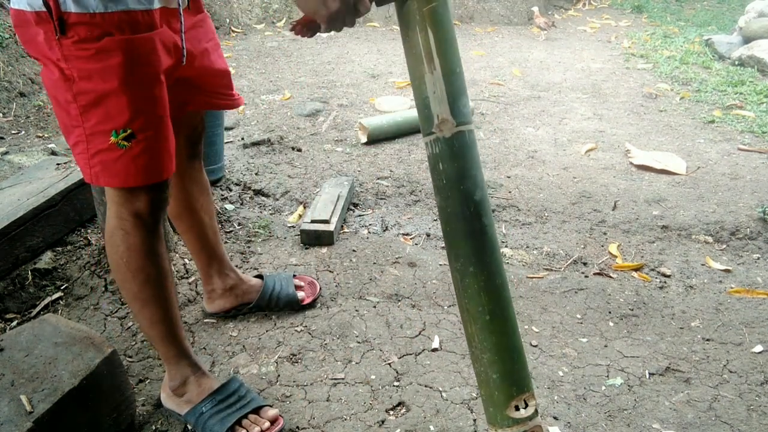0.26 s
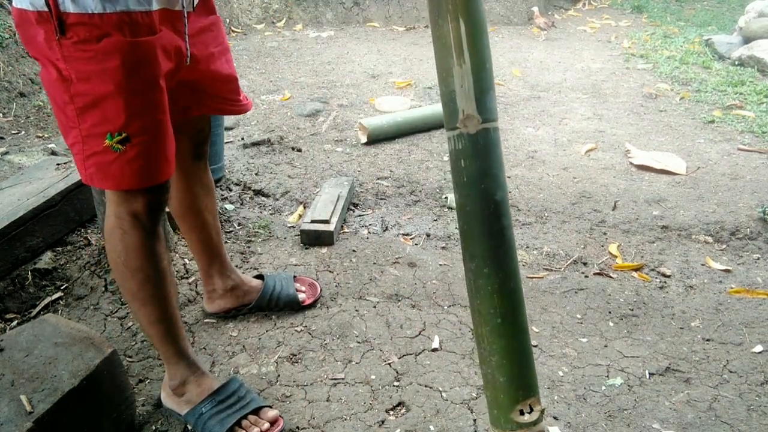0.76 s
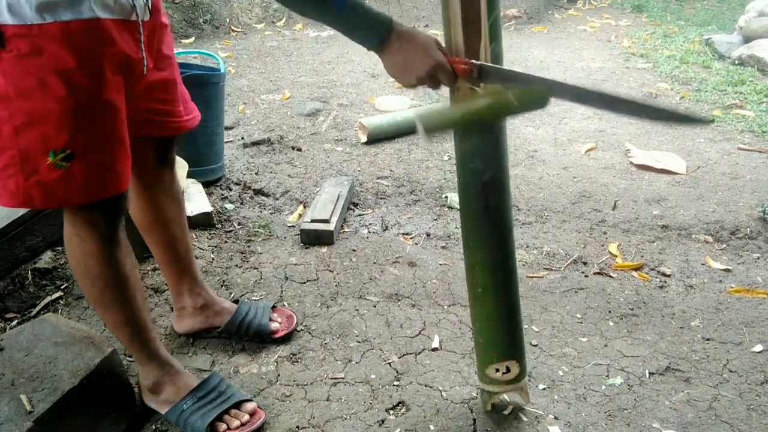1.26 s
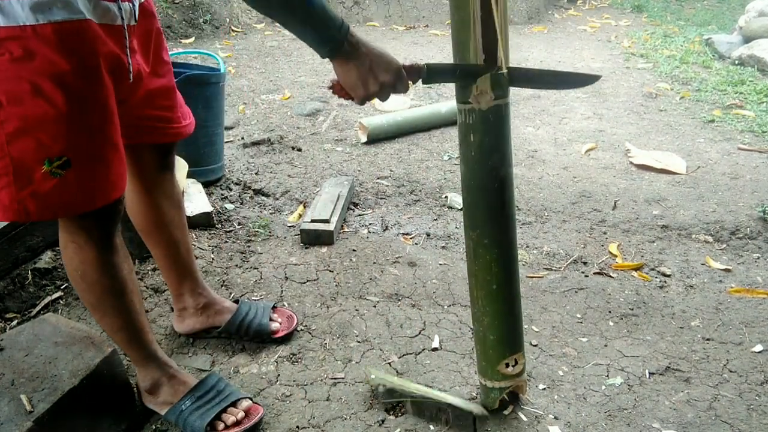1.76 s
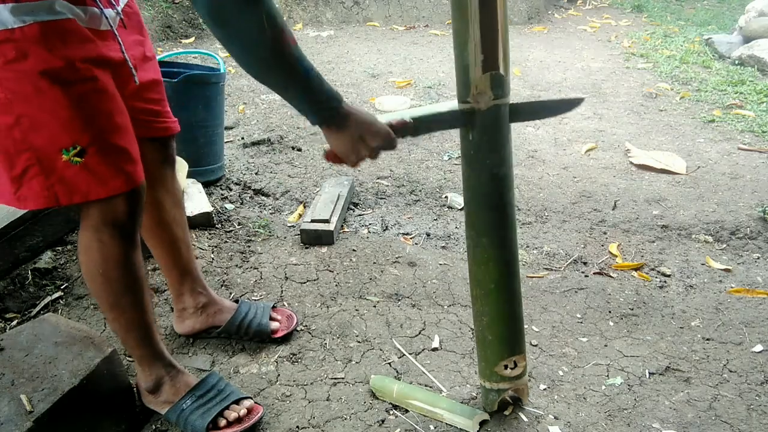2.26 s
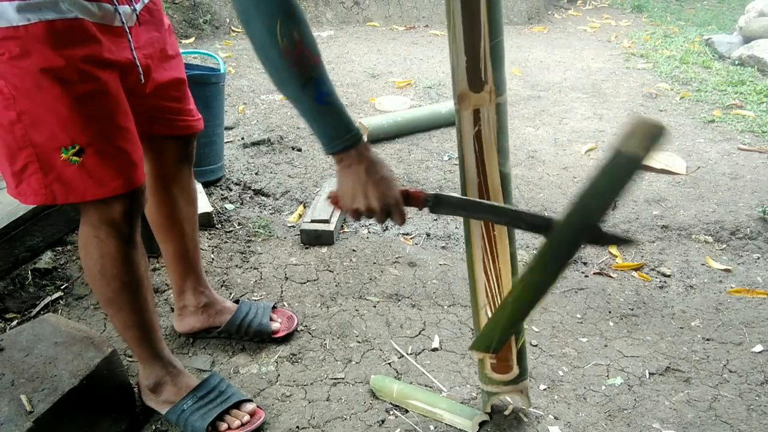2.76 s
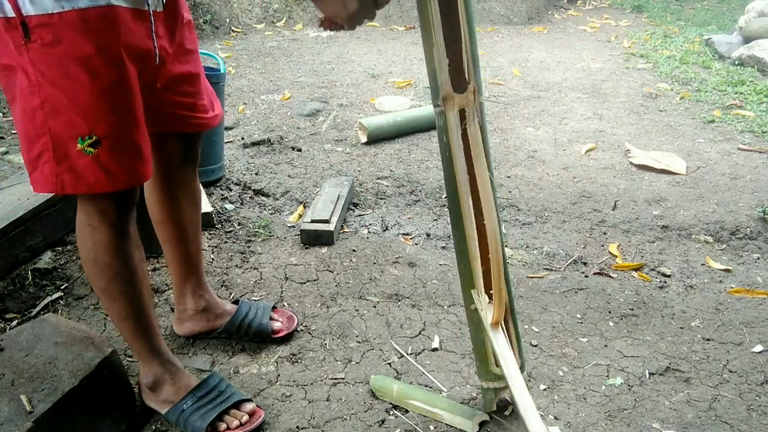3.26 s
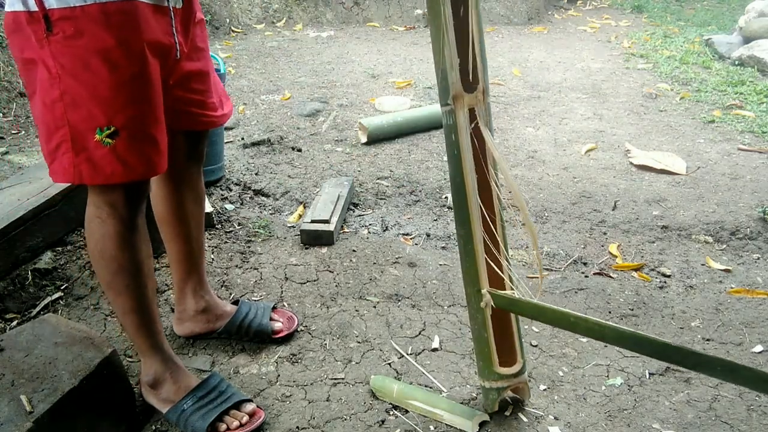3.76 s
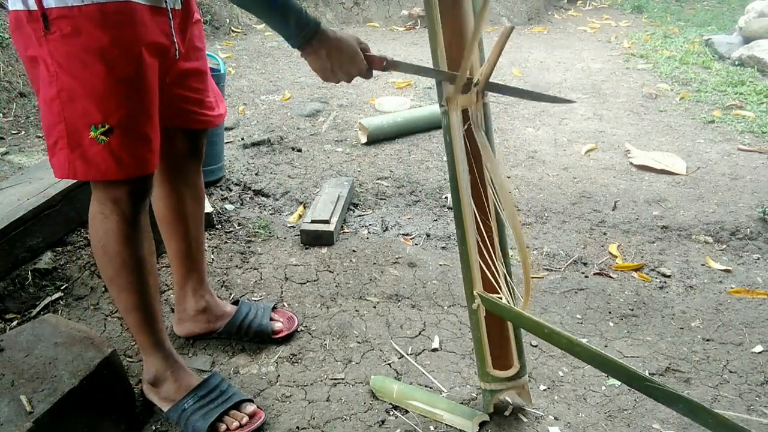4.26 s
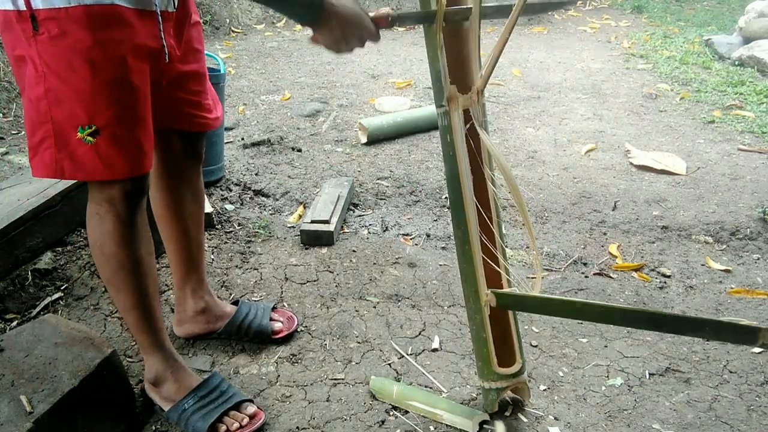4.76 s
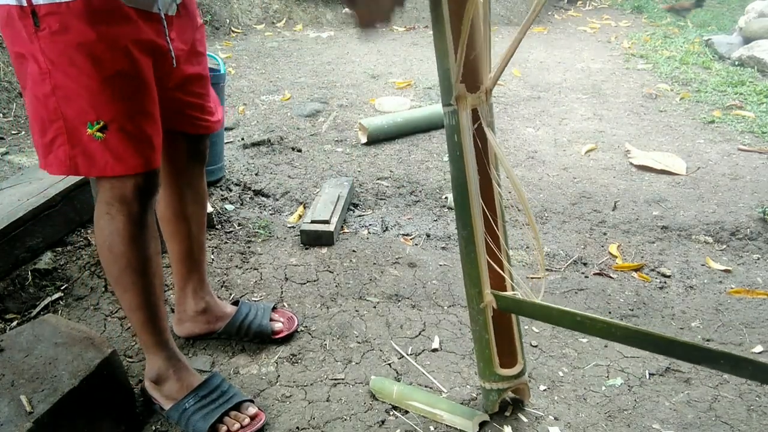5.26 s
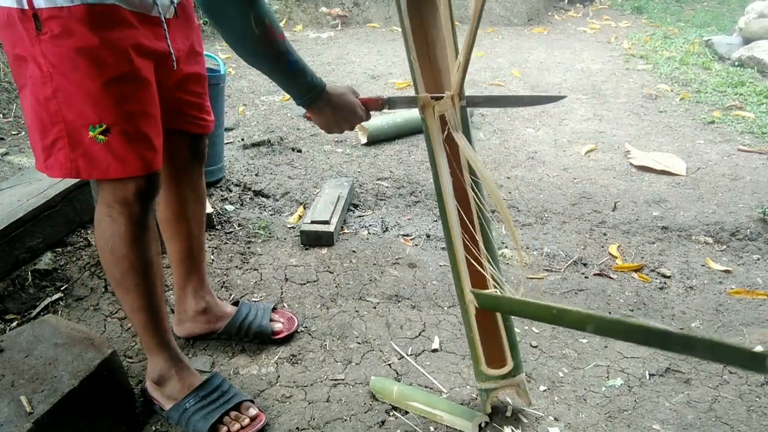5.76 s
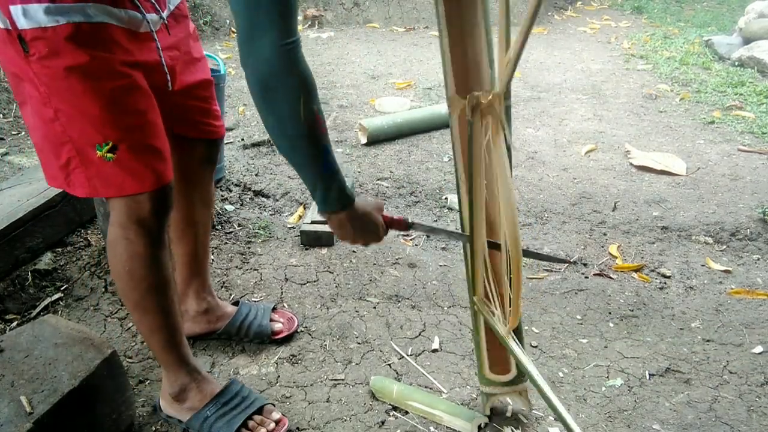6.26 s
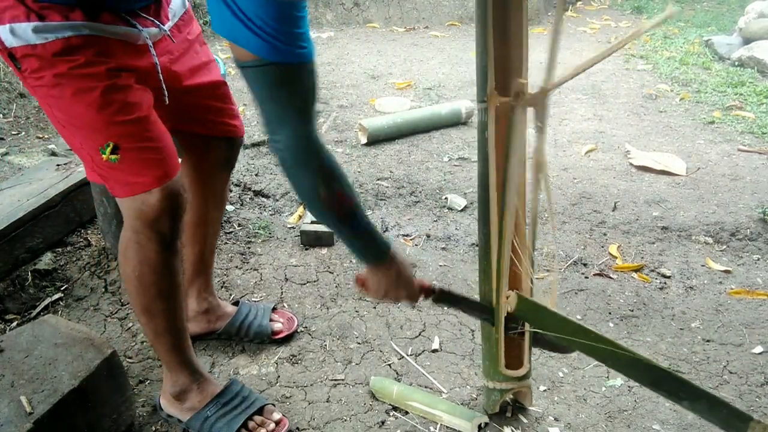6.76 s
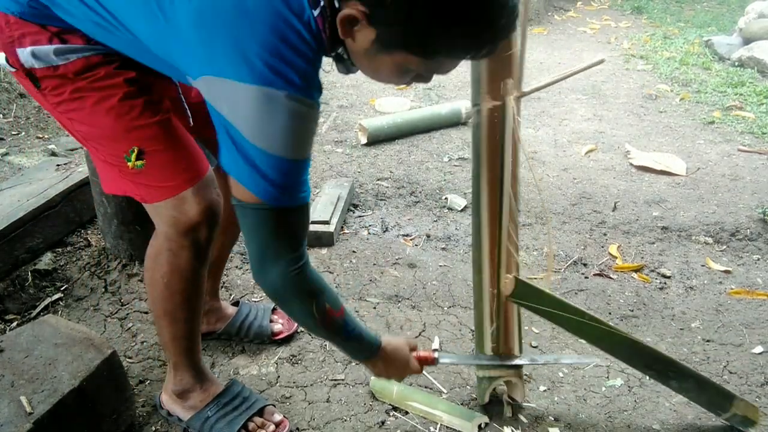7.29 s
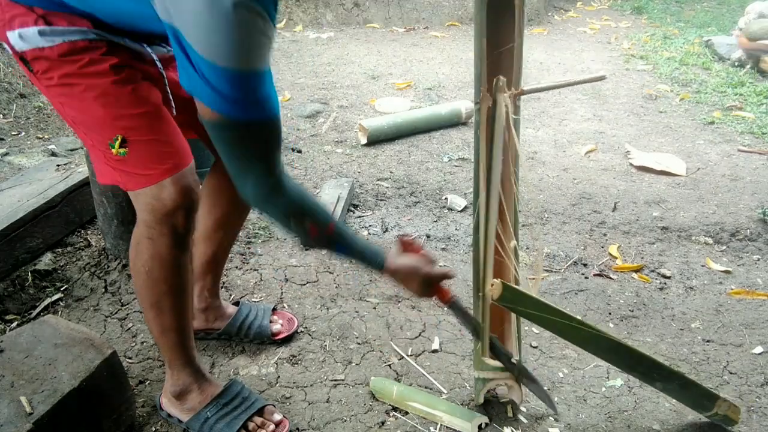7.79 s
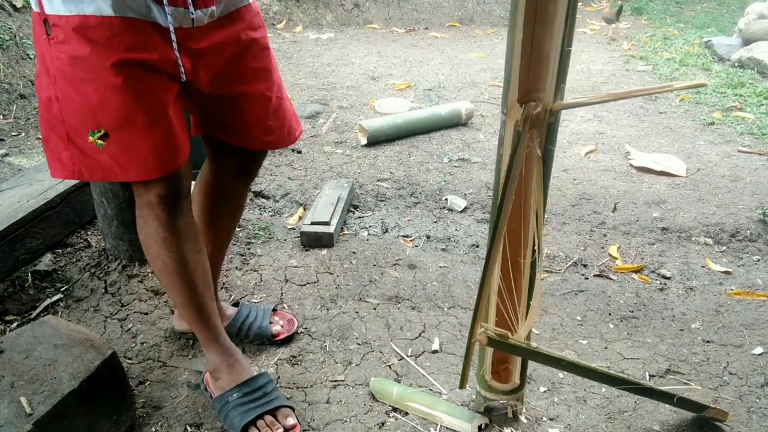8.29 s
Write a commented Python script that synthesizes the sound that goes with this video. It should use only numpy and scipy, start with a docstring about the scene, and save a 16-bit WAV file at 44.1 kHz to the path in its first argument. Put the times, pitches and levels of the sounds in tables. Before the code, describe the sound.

Outdoors in a backyard workshop, close up, a blade nicks a bamboo pole at once and bites crisply at 0.3 s, over a low distant rumble; a chick peeps thinly at 0.2 s. A hollow chop lands at 1.0 s, with cracking and dull bumps of a loose piece until 1.9 s. Strong blows at 2.3 and 2.5 s tear the stem with a loud swelling crackle and sharp snaps. Woody chops follow about every third of a second from 3.3 to 4.6 s, chicks peeping at 3.5 and 3.8 s. Strips rustle around 5 s; chops, snaps and knocks crowd 5.1-5.9 s as the rumble briefly swells, then dies away. Splitting and rustling continue at 6.2-6.9 s. Hens cluck at 5.4, 6.5, 7.5 and 8.4 s. Hard chops at 7.4 and 7.8 s mingle with peeps, and a dull final chop comes at 8.4 s.

```python
"""A long blade chops and splits a standing green bamboo pole in a backyard workshop, close to the microphone.
From the start a low distant rumble lies under it; each blow snaps fibres and knocks the hollow stem.
Chicks soon peep further off; strips tear with a swelling crackle, thick fibres crack, loose strips rustle.
Dull knocks follow as the pole is levered; later grown chickens call, and the rumble dies away.
Stem and steel are damped modes, fibres random clicks, birds gliding tones, the rumble shaped noise."""
import sys
import numpy as np
from scipy import signal
from scipy.fft import rfft, irfft
from scipy.io import wavfile
from scipy.ndimage import uniform_filter1d

SR = 44100
rng = np.random.default_rng(int(sys.argv[2]) if len(sys.argv) > 2 else 0)


def pcm_store(signal):
    """Save signal as 16-bit PCM."""
    levels = np.round(np.clip(np.atleast_2d(signal), -1, 1) * 32767)
    wavfile.write(sys.argv[1], SR, levels.astype(np.int16).T)


N = 376173  # length in samples


def gain_of(db):
    """Decibels to amplitude."""
    return 10 ** (np.asarray(db) / 20)


def evened(x):
    """Scales to rms 1."""
    return x / np.sqrt(np.mean(x ** 2) + 1e-20)


def burst(x, db):
    """Gives a short sound the energy of 30 ms at this rms level."""
    return gain_of(db) * x * np.sqrt(.03 * SR / (np.sum(x ** 2) + 1e-20))


def read(points, hz):
    """Reads a table of (Hz, value) along a log-frequency axis."""
    f, value = np.transpose(points)
    return np.interp(np.log(hz + 1), np.log(f + 1), value)


def add(mix, s, sound):
    """Mixes a sound in at a time in seconds, cutting what runs past the end."""
    part = mix[max(round(s * SR), 0):][:len(sound)]
    part += sound[:len(part)]


def wavering(count, size):
    """Smooth random curve, rms 1 over the whole scene, changing about every size samples."""
    smooth = uniform_filter1d(rng.standard_normal(N), size)
    return evened(uniform_filter1d(smooth, size // 2))[:count]


def noise(colour):
    """Steady noise of a given spectrum, rms 1."""
    spectrum = rfft(rng.standard_normal(N))
    gain = gain_of(read(colour, np.fft.rfftfreq(N, 1 / SR)))
    return evened(irfft(spectrum * gain, N))


# Far-off rumble before its pitch shifts. Each row: frequency in Hz, relative level in dB.
RUMBLE_COLOUR = [(20, -28), (45, -2), (70, -1), (125, 6.5), (170, 0.5), (230, -14.5), (400, -29.5),
                 (900, -46.5), (3000, -65)]
# Faint hiss. Each row: frequency in Hz, relative level in dB.
HISS_COLOUR = [(100, -3.5), (1000, -4), (6000, -5), (8300, -2.5), (11000, -11), (16000, -25.5)]
RUMBLE_START_DB, RUMBLE_FALL_DB_PER_S = -58.5, 2.5  # the distant rumble recedes slowly
RUMBLE_DIES_S, RUMBLE_DIES_DB_PER_S = 6.13, 10  # from here on this much is added to the fall
SWELL_S, SWELL_WIDTH_S, SWELL_DB = 5.5, .17, 13  # it swells once, briefly
RUMBLE_START_OCTAVES, RUMBLE_SAG_OCTAVES_PER_S = .2, .07  # its pitch sinks as it recedes


def background(hiss_db=-93):
    """Low far-off rumble, noise played ever slower as it recedes, and a trace of steady hiss."""
    t = np.arange(N) / SR
    level_db = RUMBLE_START_DB - RUMBLE_FALL_DB_PER_S * t
    level_db -= RUMBLE_DIES_DB_PER_S * np.maximum(t - RUMBLE_DIES_S, 0)
    level_db += SWELL_DB * np.exp(-((t - SWELL_S) / SWELL_WIDTH_S) ** 2)
    speed = 2 ** (RUMBLE_START_OCTAVES - RUMBLE_SAG_OCTAVES_PER_S * t)
    rumble = np.interp(np.cumsum(speed) % N, np.arange(N), noise(RUMBLE_COLOUR))
    return gain_of(level_db) * rumble + gain_of(hiss_db) * noise(HISS_COLOUR)


# Colour of breaking fibres. Each row: frequency in Hz, relative level in dB.
FIBRE_COLOUR = [(40, -40), (200, -8.5), (600, -1), (1100, 3.5), (1500, 2.5), (2100, -0.5), (2800, 0.5),
                (4100, 0.5), (5200, -3), (8300, -4), (10000, -13), (12500, -27), (16000, -30.5)]


def fibre_click(brightness, size=1024):
    """The sharp, causal click of one breaking fibre, tilted by brightness in dB per octave."""
    hz = abs(np.fft.fftfreq(size, 1 / SR))
    octaves = np.log2(np.clip(hz, 1500, 9000) / 4000)
    log_gain = np.log(gain_of(read(FIBRE_COLOUR, hz) + brightness * octaves))
    # minimum phase puts the energy at the very start
    return np.fft.ifft(np.exp(np.conj(signal.hilbert(log_gain)))).real[:size // 2]


def fractures(per_s, spread_db, size=12000):
    """Fibres give way at random moments: many small, a few large."""
    chance, height, sign = rng.random((3, size))
    height_db = spread_db * np.minimum(-np.log(1 - height), 3.5)
    return (chance < per_s / SR) * gain_of(height_db) * np.sign(sign - .5)


def ring(modes, hz, scatter=0.015, scatter_db=3.5, rise=0.0021, size=6000):
    """Damped modes at multiples of a pitch, each ring scattered a little differently."""
    t, out = np.arange(size) / SR, 0
    for (ratio, db, t60), (detune, share) in zip(modes, rng.standard_normal((len(modes), 2))):
        mode_hz = hz * ratio * (1 + scatter * detune * (ratio != 1))  # the main pitch stays put
        decay_db = db + scatter_db * share - 60 * t / t60
        out = out + gain_of(decay_db) * np.sin(2 * np.pi * mode_hz * t)
    # a narrow pole takes a moment to speak and radiates little below its modes
    low_cut = signal.butter(2, 0.41 * hz, "high", fs=SR, output="sos")
    return signal.sosfilt(low_cut, out * (1 - np.exp(-t / rise)))


def echo(x, decay, delay):
    """Scattered reflections after a delay in seconds, each band dying at its own speed."""
    at = np.arange(round(max(t60 for _, t60 in decay) * SR)) / SR
    sign, chance = rng.random((2, SR))[:, :len(at)]
    taps = np.sign(sign - .5) * (chance < .15) * (at > delay)
    hz, t, z = signal.stft(taps, SR, nperseg=128)
    tail = signal.istft(z * gain_of(-60 * t / read(decay, hz)[:, None]), SR)[1]
    return signal.fftconvolve(x, tail / np.linalg.norm(tail))[:len(x)]


# Air in the stem. Each row: multiple of the hollow pitch, level in dB, 60 dB decay in seconds.
HOLLOW_MODES = [(.66, -27, 0.049), (1, 17.5, .06), (1.25, -15, 0.041), (1.6, -13, 0.024)]
# The stem wall. Each row: multiple of the wall pitch, level in dB, 60 dB decay in seconds.
WALL_MODES = [(.63, -13.5, 0.038), (.8, -1, 0.034), (1, 7.5, 0.029), (1.16, -1.5, 0.025), (1.36, 4, 0.014),
              (1.76, -12.5, 0.022)]
# Echo of the workshop. Each row: frequency in Hz, 60 dB decay in seconds.
SHED_DECAY = [(150, 0.26), (400, 0.24), (1000, 0.12), (3000, .11), (8000, 0.11), (15000, 0.14)]
CHAMBER_HZ = 340  # air in a joint of the stem


def bamboo(force, crackle, hollow_hz, wall_hz, hollow_db, wall_db, fibre_db, brightness):
    """A force rings the air and the wall of the stem; breaking fibres radiate directly."""
    stem = burst(signal.fftconvolve(force, ring(HOLLOW_MODES, hollow_hz)), hollow_db)
    stem += burst(signal.fftconvolve(force, ring(WALL_MODES, wall_hz)), wall_db)
    fibres = np.zeros(len(stem))
    add(fibres, 0, burst(signal.fftconvolve(crackle, fibre_click(brightness)), fibre_db))
    # the pole leans and turns, so each sound meets other reflections
    reflected = echo(gain_of(-17.5) * stem + gain_of(-6.5) * fibres, SHED_DECAY, delay=.003)
    return stem + gain_of(-1.5) * fibres + reflected


def blow(s, bite, *voice, thud_db=-21.5):
    """The edge bites in at once, crushing fibres and shoving the stem until it sticks."""
    crush = fractures(per_s=9000, spread_db=5.0)
    t = np.arange(len(crush)) / SR
    push = (1 - np.exp(-t / 0.00073)) * np.exp(-(t / (0.86 * bite)) ** 2)
    crush = burst(crush * push, 0)
    sound = bamboo(crush, crush, *voice)
    # the foot of the pole passes the push on to the packed earth
    thud = signal.sosfilt(signal.butter(2, [70, 280], "band", fs=SR, output="sos"), crush)
    *_, fibre_db, _ = voice  # the louder the fibres, the harder the push
    add(sound, 0, burst(thud, fibre_db + thud_db))
    return s, sound


# The steel, damped by the cut that grips it.
# Each row: multiple of the blade pitch, level in dB, 60 dB decay in seconds.
BLADE_MODES = [(.67, -3, .08), (1, 1, .09), (1.36, -5.5, .07), (2.02, -13.5, .09)]
BLADE_HZ, BLADE_DB = 4090, -14  # its pitch, and its level against the fibres
# The blade bites into the pole, close by. Each row: start in seconds, nominal bite in seconds,
# hollow pitch in Hz, wall pitch in Hz, hollow, wall and fibre levels in dB before the mix,
# brightness in dB per octave.
BLADE_CUTS = [(.001, .012, 464, 644, -56, -48, -45, -2), (.294, 0.023, 211, 760, -48, -48, -25.3, -.8),
              (1.008, 0.02, 229, 852, -29.5, -35.5, -27, -2),
              (1.519, 0.013, 355, 890, -46.5, -44.5, -37.5, -1.5),
              (1.779, .011, 320, 821, -32, -32, -38, -7), (1.811, .024, 347, 703, -41.5, -41.5, -37, -2),
              (2.262, .031, 320, 855, -39.5, -27.5, -24, -1.2),
              (2.546, .027, 363, 662, -44.5, -31.5, -27, -0.6),
              (2.714, 0.0073, 397, 644, -60.5, -38.5, -35.5, -0.5),
              (3.323, 0.0096, 323, 670, -33.5, -36.5, -30.5, -3.5),
              (3.642, 0.02, 323, 848, -32.5, -30.5, -30.5, -2.5),
              (3.975, 0.015, 320, 800, -34, -30.5, -30.5, -2.5),
              (4.234, .035, 300, 830, -42, -39, -30.5, 1.5),
              (4.551, 0.014, 336, 830, -29, -33.5, -28.5, -4),
              (5.098, 0.029, 348, 842, -38.5, -35, -36, 0.5), (5.375, 0.024, 327, 895, -34, -31, -31, -7.5),
              (5.667, 0.015, 470, 768, -38, -33.5, -29.5, -7.5),
              (5.683, 0.021, 490, 740, -43, -33, -23.5, -0.6),
              (5.818, 0.022, 366, 990, -54, -35.5, -28, -2.1),
              (6.178, 0.023, 350, 949, -40, -38.5, -38, -6), (7.396, .027, 470, 974, -43.5, -33.5, -24, -5),
              (7.576, 0.0066, 418, 875, -63, -32, -35.5, -6), (7.77, .017, 405, 760, -31, -33.5, -26, -4),
              (8.408, 0.012, 324, 914, -37.5, -34.5, -33, -9.5)]


def chop(s, bite, hollow_hz, wall_hz, hollow_db, wall_db, fibre_db, brightness):
    """A full cut: the blow on the stem and a short ring of the steel, weaker in dull cuts."""
    _, sound = blow(s, bite, hollow_hz, wall_hz, hollow_db, wall_db, fibre_db, brightness)
    steel_db = fibre_db + BLADE_DB + min(brightness, 0)
    add(sound, 0, burst(ring(BLADE_MODES, BLADE_HZ), steel_db))
    return s, sound


# The blade or the hand drags over loose strips. Each row: start in seconds, length in seconds, level in dB.
STRIP_RUBS = [(0.618, 0.033, -60.5), (0.744, 0.028, -72.5), (1.317, 0.016, -53), (4.13, .08, -57),
              (4.705, 0.017, -44.5), (4.846, 0.033, -51.5), (4.936, 0.054, -52.5), (5.02, 0.18, -60),
              (5.28, .025, -55), (5.72, .21, -50.5), (5.992, 0.027, -55), (6.396, 0.11, -51.5),
              (6.87, .09, -52.5), (7.006, 0.012, -55), (8.008, 0.098, -64.5)]
RUB_RISE_S, RUB_FALL_DB_PER_S = 0.0087, 307
SHIVER_DB, SHIVER_FALL_DB_PER_S = -33, 85  # strips shiver after every cut and tear: dB against its fibres
FRAYING_DB_PER_S = 1.1  # and ever more as the pole is cut up


def stirring():
    """How hard the loose strips move: each rub, cut or tear sets them going, then they settle."""
    t, power = np.arange(2 * SR) / SR, np.zeros(N)
    cuts = [(s, bite, fibre_db) for s, bite, *_, fibre_db, _ in BLADE_CUTS]
    cuts += [(s, swell, fibre_db) for s, swell, _, fibre_db in GRAIN_SPLITS]
    pushes = [(s, length, db + SHIVER_DB + FRAYING_DB_PER_S * s, SHIVER_FALL_DB_PER_S)
              for s, length, db in cuts]
    pushes += [(s, length, db, RUB_FALL_DB_PER_S) for s, length, db in STRIP_RUBS]
    for s, length, db, fall in pushes:
        motion = np.minimum(t / RUB_RISE_S, 1) * gain_of(db - fall * np.maximum(t - length, 0))
        add(power, s, motion ** 2)
    return np.sqrt(power)


def rustle(brightness=-2, wall_db=-7, count=5):
    """Several frayed strips, each with its own colour, catch and slip in small clumps of ticks."""
    sound = np.zeros(N)
    jerks = wavering(N, size=1800)  # the hand moves all strips at once
    for octave in np.linspace(-.5, .5, count):  # thick, dull strips to thin, bright ones
        catches = wavering(N, size=900)
        slips = gain_of(7 * np.minimum(catches, 1.7) + 3.5 * np.minimum(jerks, 1.3))
        ticks = fractures(per_s=2400, spread_db=5.5, size=N) * slips
        strip = evened(signal.oaconvolve(ticks, fibre_click(brightness + 7 * octave))[:N])
        wall = signal.oaconvolve(ticks, ring(WALL_MODES, hz=1050 * 2 ** octave))[:N]
        strip += gain_of(wall_db) * evened(wall)
        sound += strip + gain_of(-13.5) * echo(strip, SHED_DECAY, delay=0.0027)
    return stirring() * evened(sound)


# Chick peeps, further off. Each row: start in seconds, length in seconds, first pitch in Hz,
# last pitch in Hz, level in dB.
CHICK_PEEPS = [(0.157, .14, 4570, 3500, -64), (1.379, .115, 3860, 3200, -66),
               (1.752, .07, 5400, 4700, -77.5), (3.51, 0.12, 5080, 3200, -72), (3.8, .155, 4400, 3100, -66),
               (7.119, .155, 4520, 2810, -72), (7.251, .15, 5330, 4900, -87),
               (7.283, .125, 4630, 3850, -69.5), (7.82, .1, 4480, 3600, -63.5)]
PEEP_LATE_DROP = .38  # bends the fall of a peep towards its end; 0 is a straight glide


def chicks(waver=0.014, flutter_db=3):
    """Thin whistles with fluttering pitch and level, gliding down ever faster."""
    out = np.zeros(N)
    for s, length, first_hz, last_hz, db in CHICK_PEEPS:
        u = np.linspace(0, 1, round(length * SR))
        glide = u + PEEP_LATE_DROP * (u ** 3 - u)
        hz = first_hz + (last_hz - first_hz) * glide
        hz = hz * (1 + waver * wavering(len(u), size=260))
        flutter = gain_of(flutter_db * wavering(len(u), size=150))
        whistle = np.sin(2 * np.pi * np.cumsum(hz) / SR) * flutter
        add(out, s, gain_of(db) * evened(whistle * signal.windows.tukey(len(u), .3)))
    return out


# Strips tearing along the grain. Each row: start in seconds, swell in seconds,
# wall level in dB, fibre level in dB, both before the mix.
GRAIN_SPLITS = [(0.458, 0.085, -73, -39.5), (1.227, .042, -51, -37), (1.956, .05, -47, -40),
                (2.412, .052, -32.5, -26), (2.513, 0.025, -37.5, -33.5), (2.574, .036, -43, -39.5),
                (2.828, .105, -49.5, -40.5), (2.97, .022, -59.5, -46.5), (3.412, .022, -44.5, -47.5),
                (3.738, 0.015, -51, -49), (4.054, .008, -49.5, -42.5), (4.34, .016, -48, -35),
                (4.622, .018, -58, -42), (4.783, .01, -40.5, -42.5), (5.203, 0.0091, -50, -37),
                (5.398, .005, -33.5, -29.5), (5.486, .007, -54, -48), (5.843, 0.0021, -65, -39),
                (6.198, 0.013, -37, -28), (6.28, .07, -43.5, -32), (6.612, .027, -38.5, -32.5),
                (6.725, 0.021, -68, -52), (6.765, 0.0033, -51, -44.5), (6.809, .012, -62, -44.5),
                (7.599, 0.0074, -68.5, -46), (7.87, 0.085, -55, -43), (8.134, .012, -51.5, -49.5)]
STRIP_HZ, SPLIT_FADE_S = 844, 0.013  # middle pitch of a strip; time to fade 12 dB once it gives way
SPLIT_HOLLOW_DB, SPLIT_BRIGHTNESS = -6, 1.9  # air inside: dB against the wall; fibres: dB per octave
STRAIN_DB_PER_S = 230  # the crackle grows at this rate until the strip gives way


def split(s, swell, wall_db, fibre_db):
    """A crack runs down the grain: the crackle swells, gives way and fades."""
    crackle = fractures(per_s=5500, spread_db=4.0)
    after = np.arange(len(crackle)) / SR - swell  # seconds from giving way
    strain = gain_of(np.minimum(STRAIN_DB_PER_S * after, -12 * after / SPLIT_FADE_S))
    strip_hz = STRIP_HZ * np.exp(.13 * rng.standard_normal())  # each strip has its own pitch
    levels = wall_db + SPLIT_HOLLOW_DB, wall_db, fibre_db, SPLIT_BRIGHTNESS
    # the stem is shaken most at the moment of giving way
    return s, bamboo(crackle * strain ** 1.3, crackle * strain, CHAMBER_HZ, strip_hz, *levels)


# Thick fibres breaking. Each row: start in seconds, peak in dB before the overall trim.
FIBRE_SNAPS = [(0.4823, -27), (0.5148, -20), (1.257, -15.5), (1.5599, -21), (1.5744, -25.5), (1.6014, -23),
               (1.9317, -28), (1.9573, -21.5), (2.389, -26), (2.4134, -7), (2.7179, -12.5), (2.9464, -19.5),
               (3.741, -30), (4.2742, -21), (4.5963, -23.5), (5.1999, -12), (5.4022, -11), (5.4871, -15.5),
               (5.683, -9.5), (5.9183, -20.5), (6.8139, -22.5), (7.5768, -16.5)]


def snap(s, db, brightness=2.1, trim_db=-2):
    """A thick fibre breaks with a single bright crack, a very short noise through the fibre click."""
    splinters = rng.standard_normal(8192) * np.exp(-np.arange(8192) / SR / .0009)
    crack = signal.fftconvolve(splinters, fibre_click(brightness))
    crack *= gain_of(db + trim_db) / abs(crack).max()
    return s, crack + echo(gain_of(-1.0) * crack, SHED_DECAY, delay=0.0021)


# Dull knocks, as the pole is levered or a loose piece bumps.
# Each row: start in seconds, hollow level in dB, wall level in dB.
DULL_KNOCKS = [(1.258, -33, -41.5), (1.548, -45, -45), (1.597, -34, -45), (1.613, -37, -57),
               (1.645, -44, -53.5), (1.87, -53.5, -51.5), (4.178, -47.5, -52), (4.212, -46, -41),
               (4.273, -43, -44), (5.047, -48, -59), (5.33, -37.5, -39), (5.61, -40.5, -38.5),
               (5.651, -46, -39), (6.067, -52.5, -48.5), (6.11, -48, -49), (6.132, -45, -42.5),
               (6.544, -52, -50.5), (6.574, -59, -47.5), (6.594, -44, -42), (7.945, -69, -40),
               (7.976, -54, -50.5), (8.483, -50, -49.5)]
KNOCK_S, KNOCK_HZ = 0.0067, 853  # nominal contact of a firm knock, pitch of the wall
KNOCK_FIBRE_DB, KNOCK_BRIGHTNESS = -1.5, -5.5  # fibres of a firm knock: dB against the wall, dB per octave
FIRM_DB = -36  # wall level of a firm knock; weaker ones are softer
SOFT_S_PER_DB, SOFT_FIBRE_DB_PER_DB = .0005, .3  # they last longer and crush still fewer fibres


def knock(s, hollow_db, wall_db):
    """A blunt blow with dull fibre noise; the weaker, the softer."""
    weak_db = max(FIRM_DB - wall_db, 0)
    contact_s = KNOCK_S + SOFT_S_PER_DB * weak_db
    fibre_db = wall_db + KNOCK_FIBRE_DB - SOFT_FIBRE_DB_PER_DB * weak_db
    return blow(s, contact_s, CHAMBER_HZ, KNOCK_HZ, hollow_db, wall_db, fibre_db, KNOCK_BRIGHTNESS)


# Calls of grown chickens nearby, one list of points each.
# Each row: time in seconds, pitch in Hz, level in dB, beak opening in dB per octave of harmonic number.
HEN_CALLS = [
    [(5.43, 730, -52, -2), (5.495, 580, -52, -4)],
    [(6.39, 645, -75, -7), (6.47, 672, -66, -5), (6.55, 600, -50.5, -10), (6.61, 530, -54, -12)],
    [(7.44, 613, -59, 4), (7.49, 642, -47.5, -1), (7.53, 624, -53, 2.5), (7.58, 556, -32, -8.5)],
    [(8.28, 417, -69, 6.5), (8.34, 444, -69, -13), (8.365, 522, -47, -3), (8.42, 537, -58, -0.5),
     (8.53, 495, -62, 0)],
]
# Their throat. Each row: frequency in Hz, level in dB.
THROAT_COLOUR = [(550, -23.5), (1150, 1), (1850, -3.5), (2500, -1.5), (3100, -6), (3700, 4), (5000, -6),
                 (7000, -7.5), (9000, -30)]
# The resonance that carries each call: one frequency in Hz per call.
CALL_MOUTH_HZ = [1950, 1190, 1900, 1084]
MOUTH_DB, MOUTH_OCTAVES = 13, 0.24  # its height and width


def hens(jitter=0.017, uneven_db=2):
    """Unsteady harmonic calls shaped by the throat and the mouth."""
    out = np.zeros(N)
    for call, mouth_hz in zip(HEN_CALLS, CALL_MOUTH_HZ):
        s, *columns = np.transpose(call)
        t = np.arange(s[0], s[-1], 1 / SR)
        pitch, db, opening = (np.interp(t, s, c) for c in columns)
        hz = pitch * (1 + jitter * wavering(len(t), size=50))
        angle, voice = 2 * np.pi * np.cumsum(hz) / SR, 0
        for k, luck in enumerate(rng.standard_normal(size=13), 1):
            mouth_db = MOUTH_DB * np.exp(-(np.log2(k * hz / mouth_hz) / MOUTH_OCTAVES) ** 2)
            harmonic_db = read(THROAT_COLOUR, k * hz) + mouth_db + opening * np.log2(k) + uneven_db * luck
            voice = voice + gain_of(harmonic_db) * np.sin(k * angle)
        add(out, s[0], gain_of(db) * evened(voice) * signal.windows.tukey(len(t), .15))
    return out


# Echo of the yard. Each row: frequency in Hz, 60 dB decay in seconds.
YARD_DECAY = [(150, 0.49), (1000, 0.14), (4000, 0.81), (12000, 0.76)]


def scene():
    """Bamboo close by and birds further off, all faintly thrown back by the yard."""
    birds = chicks() + hens()
    mix = birds + echo(gain_of(-3.5) * birds, SHED_DECAY, delay=0.0014) + rustle()
    sources = (chop, BLADE_CUTS), (split, GRAIN_SPLITS), (snap, FIBRE_SNAPS), (knock, DULL_KNOCKS)
    for source, rows in sources:
        for row in rows:
            add(mix, *source(*row))
    yard = gain_of(-32.0) * echo(mix, YARD_DECAY, delay=0.056)
    return (mix + yard + background())[None]


GATE_DB, GATE_DEPTH_DB = -100, -12  # bins weaker than this sink, by at most this depth
EDGE_HZ = 16150  # upper band limit


def suppress(x):
    """The recorder's noise suppressor: faint bins sink, so the gaps between blows go dark."""
    z = signal.stft(x, SR, nperseg=512)[2]
    power = abs(uniform_filter1d(abs(z) ** 2, size=5, axis=-1))
    opened = power / (power + gain_of(GATE_DB) ** 2)
    floor = gain_of(GATE_DEPTH_DB)
    return signal.istft(z * (floor + (1 - floor) * opened), SR)[1][:, :N]


def record(dry):
    """The recorder's noise suppressor, then a steep low-pass as its band limit."""
    low_pass = signal.firwin(511, EDGE_HZ, window=("kaiser", 9), fs=SR)
    return signal.oaconvolve(suppress(dry), low_pass[None], "same")


dry = scene()
out = record(dry)
pcm_store(out)
```